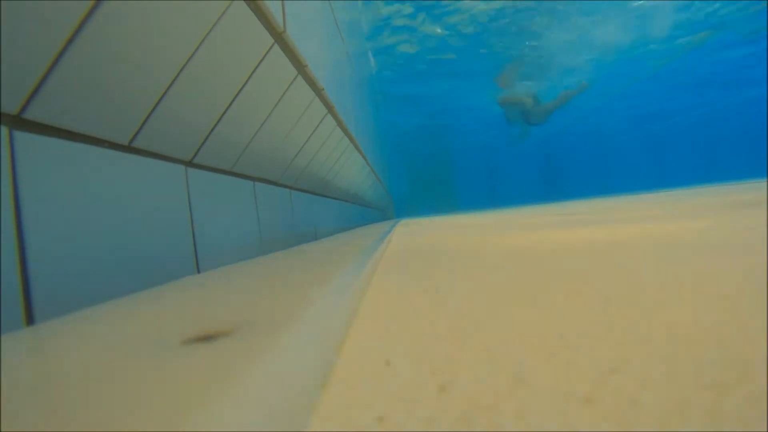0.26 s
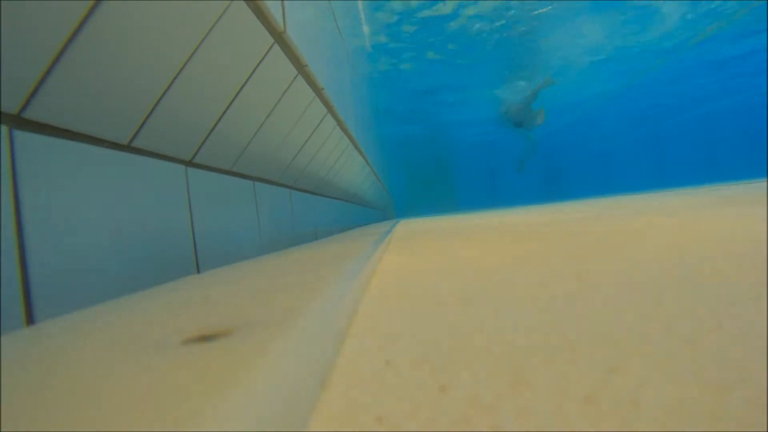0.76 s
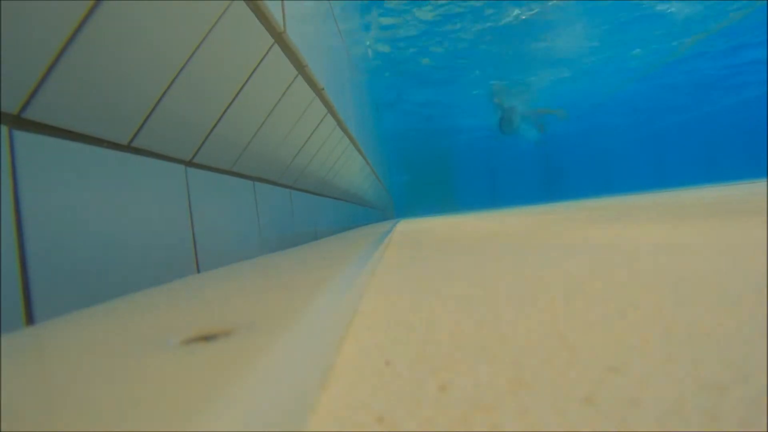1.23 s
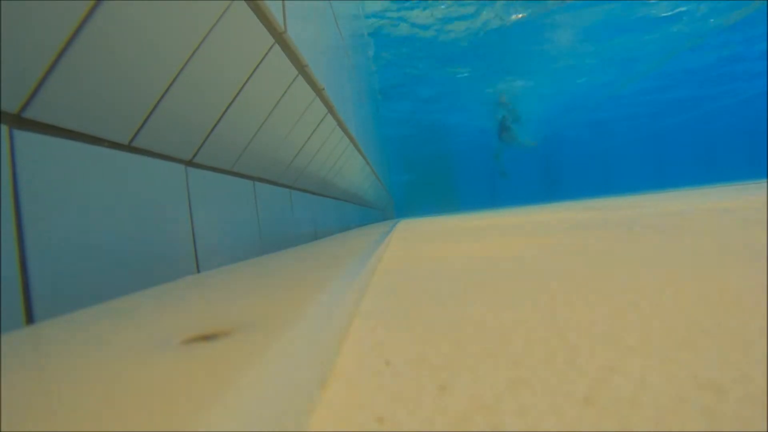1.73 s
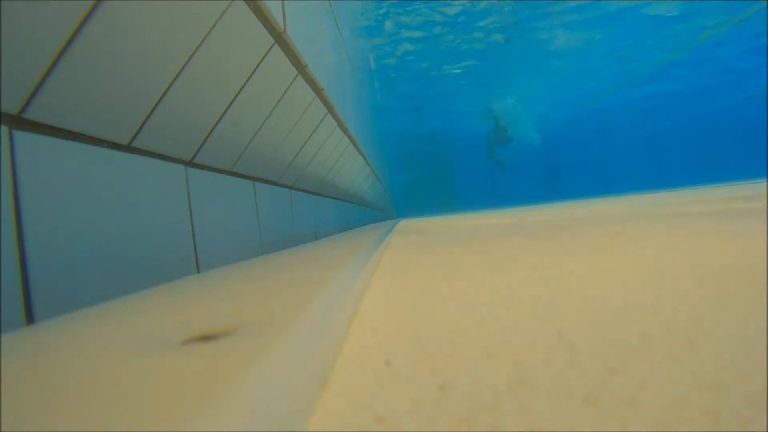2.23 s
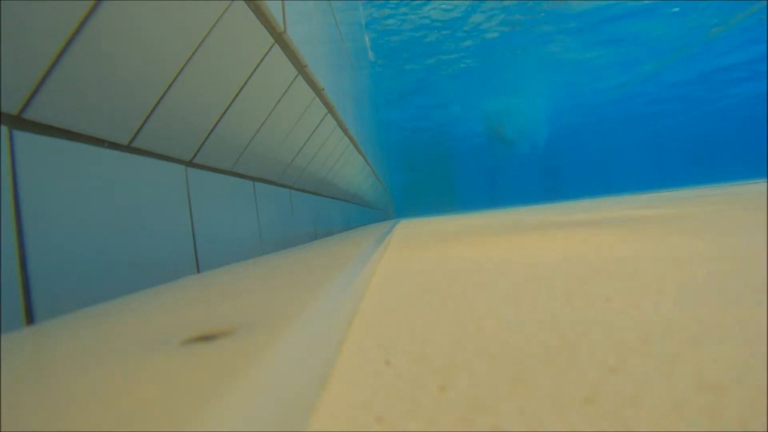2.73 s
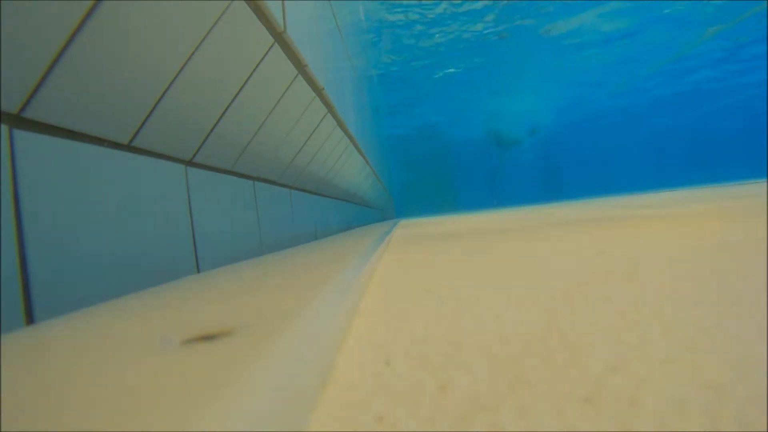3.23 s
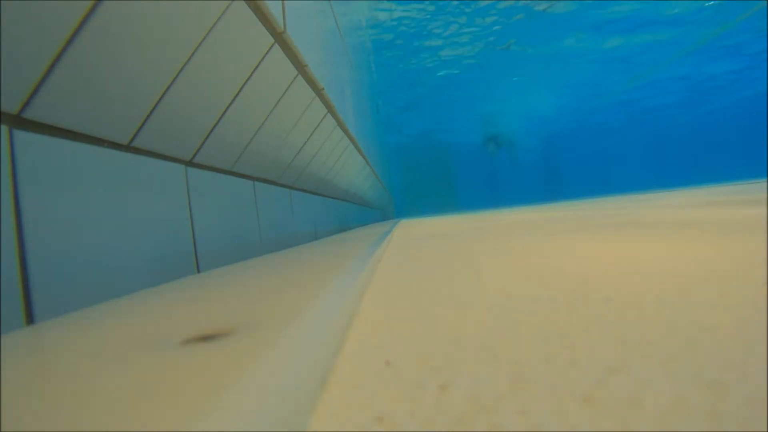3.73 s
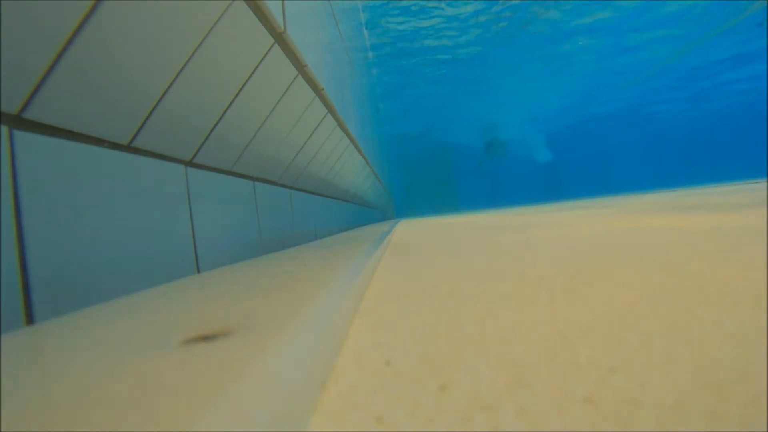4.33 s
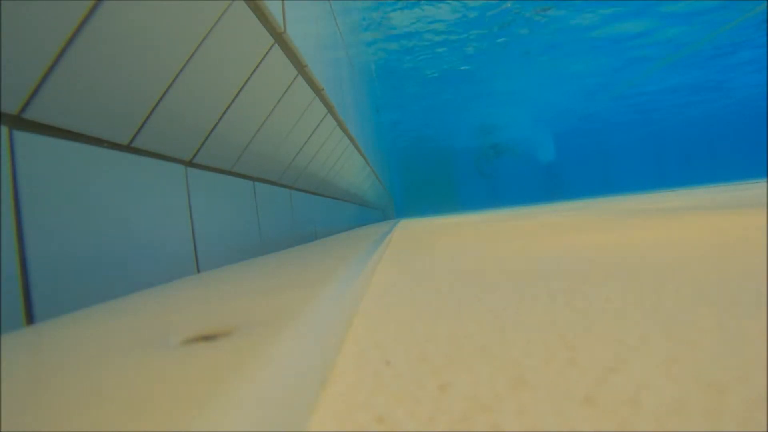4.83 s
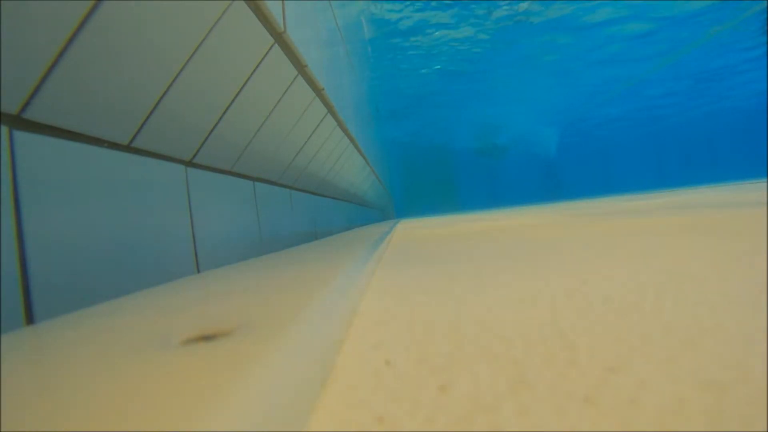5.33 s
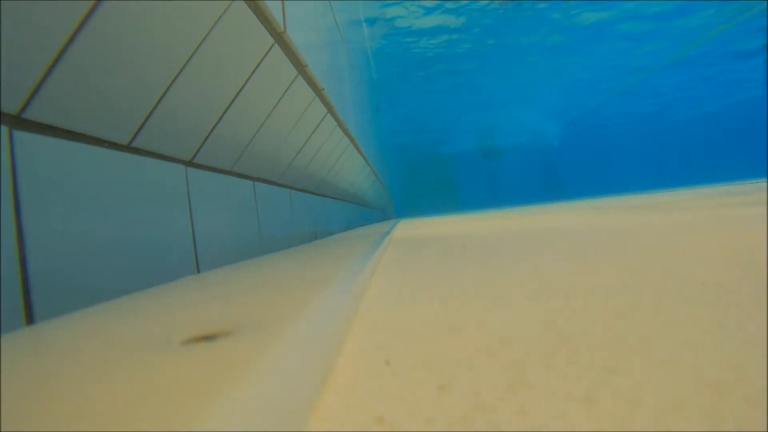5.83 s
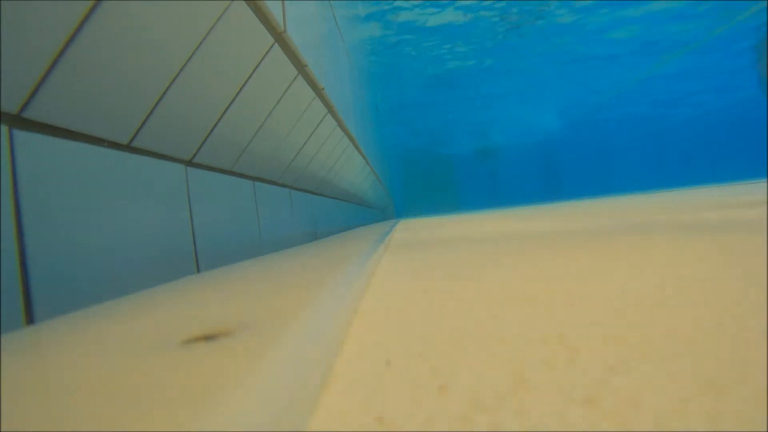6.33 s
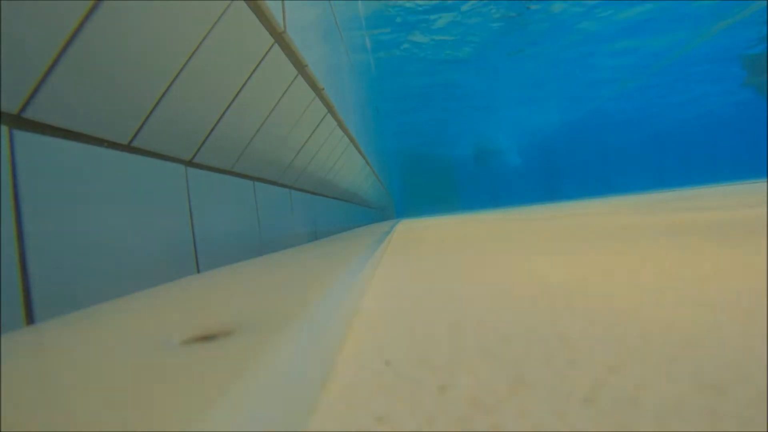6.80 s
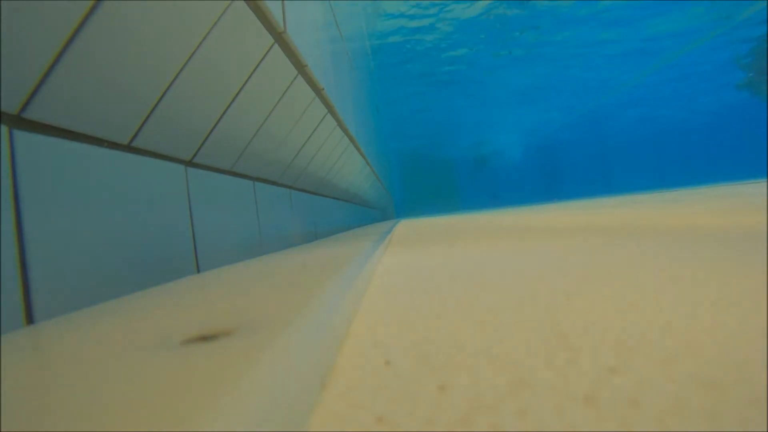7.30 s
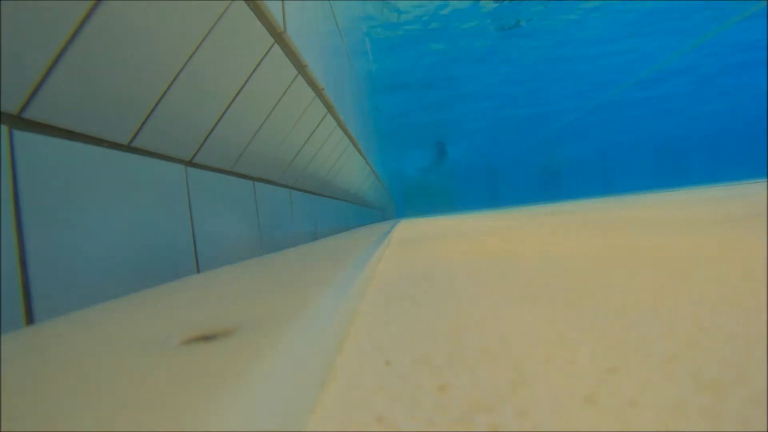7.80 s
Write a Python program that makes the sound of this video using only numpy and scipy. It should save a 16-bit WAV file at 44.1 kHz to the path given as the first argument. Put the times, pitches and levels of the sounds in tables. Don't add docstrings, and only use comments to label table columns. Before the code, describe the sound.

Muffled underwater pool ambience: low motor drone and weaker high tones, broad water rush and deep heaving bumps. Bubbles plop, gurgle and tick at irregular moments, brightest early on, over a thin flickering hiss from the stirred surface. Strokes become gradually fainter as swimmers recede. The close housing adds a small high ring, and low-quality digital warble pecks at the texture, with one tiny dropout close to the finish.

```python
import sys
import numpy as np
from scipy import signal
from scipy.fft import rfft, irfft, next_fast_len
from scipy.io import wavfile
from scipy.ndimage import uniform_filter1d, minimum_filter1d

SR = 44100
rng = np.random.default_rng(int(sys.argv[2]) if len(sys.argv) > 2 else 0)


def inscribe(sig):
    pcm = np.round(np.clip(np.atleast_2d(sig).T, -1, 1) * 32767)
    wavfile.write(sys.argv[1], SR, pcm.astype(np.int16))


def undo_db(level):
    steps = np.asarray(level, float) / 20
    return 10 ** steps


N = 355446


def colour(x, spectrum):
    hz, db = np.transpose(spectrum)
    size = next_fast_len(N + SR)
    log_hz = np.log(np.fft.rfftfreq(size, 1 / SR) + 1)
    log_gain = np.log(undo_db(np.interp(log_hz, np.log(hz), db, left=db[0], right=-90)))
    cepstrum = irfft(log_gain, size)
    cepstrum[1:size // 2] *= 2
    cepstrum[size // 2 + 1:] = 0
    y = irfft(rfft(x, size) * np.exp(rfft(cepstrum)), size)[:N]
    return y / y.std()


def noise(spectrum):
    return colour(rng.standard_normal(N), spectrum)


def walk(rate):
    hold = int(SR / rate)
    steps = np.repeat(rng.standard_normal(N // hold + 1), hold)
    return 1.45 * uniform_filter1d(uniform_filter1d(steps, hold), hold)[:N]


def grains(rate, spread_db):
    size_db = spread_db * np.minimum(rng.exponential(size=N), 3)
    return (rng.random(N) < rate / SR) * undo_db(size_db) * rng.choice([-1, 1], N)


def curve(table):
    s, level = np.transpose(table)
    return np.interp(np.arange(N) / SR, s, level)


def bumps(events, half_s=None):
    t = np.arange(N) / SR
    return sum(e[1] * np.exp(-((t - e[0]) / (half_s or e[2])) ** 2) for e in events)


def bubbles(events, cycles, glide, trim_db):
    out = np.zeros(N + SR)
    for s, db, hz in events:
        cycle = np.arange(0, 10 * cycles, hz / SR)[:SR]
        age = cycle / cycles
        ring = age * np.exp(1 - age) * np.sin(2 * np.pi * cycle * (1 + glide * age))
        start = int(s * SR)
        out[start:start + len(cycle)] += undo_db(db + trim_db) * ring
    return out[:N]


# frequency in Hz, level in dB rms.
PUMP_TONES = [(73.97, -55.9), (100.06, -55.4), (145.08, -55.5), (147.9, -38.1), (290.15, -59.6),
              (300.24, -59.3), (408.54, -64.3), (424.98, -65.1), (590.27, -58.5), (682.37, -56.8),
              (790.45, -53.2), (839.73, -61.8), (865.88, -50.6), (882.55, -54.8), (890.51, -48.1),
              (915.16, -50.6), (3451.84, -84.8), (9000.01, -87.5), (9816.37, -80.6), (9846.38, -79.0)]
# time in seconds, level in dB rms.
VANE_LEVEL = [(0, -38), (.86, -35.5), (1.5, -37.5), (1.9, -36), (3.17, -36.5), (3.39, -41), (3.62, -37),
              (4.1, -39), (4.45, -36.5), (4.6, -39), (5.01, -36), (5.27, -39.5), (5.5, -37), (5.76, -39),
              (6.06, -36), (6.26, -41), (6.42, -37.5), (8.06, -38.5)]
VANE_HZ = 147.9


def pumps():
    t = np.arange(N) / SR
    out = np.zeros(N)
    for hz, db in PUMP_TONES:
        level_db = curve(VANE_LEVEL) - 0.4 if hz == VANE_HZ else db + 0.99 * walk(2.38)
        out += 2 ** 0.5 * undo_db(level_db) * np.sin(2 * np.pi * (hz * t + rng.random()))
    return out


# frequency in Hz, level in dB per Hz.
HEAVE_SPECTRUM = [(10, -5), (20, 4), (35, -4), (48, -14), (65, -32)]
THUD_SPECTRUM = [(25, -27.5), (42, -7.5), (55, -7), (76, -1), (98, -1), (112, -13), (138, -1), (160, -12.5),
                 (190, -31)]
RUSH_SPECTRUM = [(140, -29.5), (165, -2.5), (215, -4.5), (255, -11), (310, -7.5), (450, -9.5), (590, -4),
                 (720, -6), (830, -4), (960, 0), (1030, -8), (1075, -4), (1250, -12), (1500, -14),
                 (1750, -33.5)]
# centre in seconds, strength in dB, half length in seconds.
WALL_WAVES = [(.82, 10, 0.28), (1.6, 9, .2), (2.2, -1, .5), (3.5, 2, .2), (4.05, 4, .12), (4.4, -8, .2),
              (5.01, 10, 0.15), (5.5, 9, .15), (6.06, 8, 0.24), (7.3, 10.5, 0.55), (8.0, -4, .1)]
# time in seconds, level in dB.
FLOW_LEVEL = [(0, -35.5), (.7, -37), (1.0, -35.5), (1.9, -37.5), (2.3, -35.5), (2.9, -35), (3.3, -37.5),
              (4.4, -35.5), (5.5, -37), (5.9, -39), (7.0, -37), (8.06, -39.5)]


def pipes():
    wave_db = bumps(WALL_WAVES)
    heave = undo_db(-51.5 + wave_db) * noise(HEAVE_SPECTRUM)
    thud = undo_db(-42.5 + 0.29 * wave_db) * noise(THUD_SPECTRUM)
    rush = undo_db(curve(FLOW_LEVEL) - 1.0 + 1.1 * walk(9)) * noise(RUSH_SPECTRUM)
    return heave + thud + rush


# frequency in Hz, level in dB per Hz.
SLOSH_SPECTRUM = [(1450, -17), (1700, -4.5), (2000, 0.5), (2200, -1.5), (2450, -10.5), (3100, -11),
                  (3900, -8.5), (4500, -12), (5000, -36)]
HOUSING_SPECTRUM = [(4200, -22.5), (4700, -12.5), (5300, -6), (5800, -0.5), (6200, -5.5), (6700, -1),
                    (7200, -12.5), (7700, -23)]
HISS_SPECTRUM = [(6900, -18), (7300, -1.5), (7900, -3), (9600, 0), (10800, -6.5), (11500, -9),
                 (12800, -7.5), (13900, -10.5), (14100, -53)]
# time in seconds, strength in dB.
SWIM_STROKES = [(0, 2.5), (.53, 4.5), (.95, 0.5), (1.25, 2.5), (1.85, 2.5), (2.1, 3.5), (2.5, 2.5),
                (2.75, 1.5), (2.97, 0.5), (3.3, 2), (3.55, 2.5), (3.85, 3), (4.2, 2), (4.65, 1.5),
                (4.98, 4), (5.25, 2.5), (5.5, 1), (5.7, 1.5), (5.85, 1), (6.55, 3.5), (6.9, 2.5),
                (7.55, 4.5), (7.8, 2)]
# calm level in dB, share of the stir as a ratio.
FIZZ_LEVELS = [
    (-59, .7),
    (-54, 1),
    (-59, .6),
]
STROKE_HALF_S, RECEDE_DB_PER_S = 0.13, 0.41


def surface():
    stir_db = bumps(SWIM_STROKES, half_s=STROKE_HALF_S) - RECEDE_DB_PER_S * np.arange(N) / SR
    slosh_db, ring_db, hiss_db = (db + share * stir_db for db, share in FIZZ_LEVELS)
    pops = grains(rate=400, spread_db=6.5)
    far_pops = np.roll(pops, N // 2)
    slosh = colour(rng.standard_normal(N) + 0.6 * pops, SLOSH_SPECTRUM)
    ring = colour(rng.standard_normal(N) + 1.5 * pops, HOUSING_SPECTRUM)
    hiss = colour(rng.standard_normal(N) + far_pops, HISS_SPECTRUM)
    slosh *= undo_db(slosh_db + 0.4 + 1.2 * walk(22))
    ring *= undo_db(ring_db + 1.05 + 1.2 * walk(26))
    hiss *= undo_db(hiss_db + 0.55 + 1.2 * walk(30))
    return slosh + ring + hiss


def babble(count=110, low_hz=350, octaves=2, db=-42, cycles=5.9, glide=0.015):
    events = []
    for when, size, pitch in rng.random((count, 3)):
        events.append((when * N / SR, db - 7.6 * size - 3.2 * pitch, low_hz * 2 ** (octaves * pitch)))
    return bubbles(events, cycles=cycles, glide=glide, trim_db=0.5)


# start in seconds, peak level in dB, frequency in Hz.
BLOOP_EVENTS = [(0.0274, -40, 1600), (0.9532, -41, 1720), (1.501, -45, 2100), (2.2069, -45, 1910),
                (2.6314, -48, 1880), (2.6908, -41, 1860), (2.8045, -40, 1600), (2.9886, -47, 2070),
                (4.2083, -43, 1990), (5.0185, -48, 1620), (5.7334, -51, 2060), (6.797, -37, 2070),
                (6.9207, -48, 1660), (7.0873, -44, 1580), (7.5018, -44, 1640), (7.5652, -41, 1800)]


def bloops():
    return bubbles(BLOOP_EVENTS, cycles=6.0, glide=0.01, trim_db=-4.0)


# start in seconds, peak level in dB, frequency in Hz.
CRACKLE_EVENTS = [(0.0563, -42, 9910), (0.2563, -48, 9830), (0.8654, -43, 9500), (1.1932, -42, 8670),
                  (1.2156, -42, 9900), (1.2294, -42, 8340), (1.296, -39, 9700), (1.8058, -43, 9860),
                  (1.9884, -37, 9370), (2.0224, -43, 8450), (2.0614, -43, 9510), (3.1956, -39, 8550),
                  (3.8033, -43, 9720), (4.3565, -40, 8310), (4.9262, -46, 9500), (5.0868, -42, 8620),
                  (5.5029, -44, 7600), (5.7064, -46, 7620), (6.321, -44, 9010), (6.9296, -41, 9840),
                  (7.4769, -44, 9570), (7.7218, -42, 8570)]


def crackles():
    return bubbles(CRACKLE_EVENTS, cycles=3.1, glide=0.0073, trim_db=1.0)


# start in seconds, peak level in dB, frequency in Hz.
TICK_EVENTS = [(0.1366, -34.5, 6620), (0.2567, -34, 5790), (0.6065, -26.5, 5900), (0.8664, -41, 5920),
               (1.0964, -39, 5580), (1.2047, -35, 5900), (1.2291, -31.5, 6600), (1.2974, -41, 5400),
               (1.4132, -36, 6090), (1.5898, -29, 5430), (1.6392, -39, 6530), (1.923, -35, 5700),
               (1.9884, -36, 5710), (2.0614, -38, 5710), (2.5324, -33, 5880), (3.196, -38, 6690),
               (4.357, -41, 6050), (4.568, -35, 5670), (4.8065, -35, 5930), (4.9264, -37, 6580),
               (5.5483, -37, 6670), (6.9296, -42, 6750), (7.0189, -34, 5840), (7.136, -33, 6630),
               (7.4774, -36, 5690)]


def ticks():
    return bubbles(TICK_EVENTS, cycles=3.8, glide=0.012, trim_db=-3.0)


# start in seconds, peak level in dB, frequency in Hz.
GURGLE_EVENTS = [(.325, -29.5, 695), (.455, -40, 1320), (.585, -43, 1180), (.895, -43.5, 459),
                 (1.005, -37, 480), (1.025, -35, 1140), (1.985, -46, 1326), (2.105, -41, 1220),
                 (2.235, -37, 426), (2.735, -32, 613), (3.255, -38, 373), (3.615, -35, 543),
                 (4.485, -37, 647), (5.445, -34, 490), (5.635, -40, 1450), (6.355, -35, 496),
                 (6.755, -33.5, 1260), (6.83, -39, 617), (7.045, -29, 633), (7.515, -39, 1290)]


def gurgles():
    return bubbles(GURGLE_EVENTS, cycles=6.0, glide=0.015, trim_db=-1.5)


# start in seconds, peak level in dB, frequency in Hz.
BOOM_EVENTS = [
    (1.53, -32, 47.5),
    (3.22, -40, 390),
    (5.57, -36.5, 218),
    (7.4, -39.5, 306),
    (7.7, -37.5, 210),
]


def booms():
    return bubbles(BOOM_EVENTS, cycles=3.8, glide=0.0092, trim_db=-1.5)


def scene():
    far_fizz = babble(count=90, low_hz=1700, octaves=0.35, db=-52, cycles=12.5, glide=0)
    water = pumps() + pipes() + surface() + babble() + far_fizz
    rings = bloops() + crackles() + ticks() + gurgles() + booms()
    return (water + rings)[None]


FRAME_S = 1024 / 48000


def cosine_basis():
    hop = round(FRAME_S * SR)
    n = np.arange(2 * hop) + 0.5
    k = np.arange(hop)[:, None] + 0.5
    window = np.sin(np.pi * n / (2 * hop))
    basis = np.sqrt(2 / hop) * window * np.cos(np.pi / hop * (n + hop / 2) * k)
    return hop, basis, k[:, 0] * SR / (2 * hop)


# frequency in Hz, level in dB.
MASKING_LEVEL = [(1500, -14), (2300, -5), (2900, -3.5), (3500, -4), (4400, -6), (5000, -10), (9500, -9),
                 (11300, -4.5), (12600, -4), (13900, -2)]


def mask(x, size=5):
    hop, basis, hz = cosine_basis()
    lines = np.lib.stride_tricks.sliding_window_view(x, 2 * hop)[::hop] @ basis.T
    bands = np.arange(0, hop, size)
    power = uniform_filter1d(np.add.reduceat(lines ** 2, bands, axis=1), size=2, axis=0)
    mask_hz, mask_db = np.transpose(MASKING_LEVEL)
    under_db = np.interp(np.log(hz[bands]), np.log(mask_hz), mask_db, left=-90)
    usual = uniform_filter1d(power, size=15, axis=0)
    kept = minimum_filter1d(power > usual * undo_db(under_db) ** 2, size=2, axis=0, origin=-1)
    lost = (lines * ~kept[:, np.arange(hop) // size]) @ basis
    out = x.copy()
    out[:len(lost) * hop] -= lost[:, :hop].ravel()
    out[hop:(len(lost) + 1) * hop] -= lost[:, hop:].ravel()
    return out


# centre in seconds, length in frames, rounding step in dB.
STARVED_FRAMES = [(.188, 1, -34.5), (0.215, 1, -30.5), (.347, 1, -29.5), (0.602, 1, -31), (.794, 1, -34),
                  (.921, 1, -33), (1.476, 1, -35), (1.589, 1, -28.5), (1.746, 1, -37), (1.924, 1, -35.5),
                  (2.364, 1, -31.5), (2.449, 1, -33), (2.563, 1, -34.5), (2.758, 2, -33), (2.855, 1, -35.5),
                  (3.005, 1, -35.5), (3.045, 2, -35.5), (3.546, 1, -35), (3.59, 1, -32), (3.643, 1, -31),
                  (3.907, 1, -32), (4.283, 1, -31), (4.626, 1, -36.5), (5.209, 1, -29.5), (5.252, 1, -34),
                  (6.297, 1, -33.5), (6.362, 1, -33.5), (6.766, 1, -34), (7.385, 1, -32), (7.706, 1, -34.5)]
PINCHED_CENTRES = [.317, .361, 1.049, 1.584, 1.68, 3.9, 4.496]
PINCHED_DB = -37


def starve(x):
    hop, basis, hz = cosine_basis()
    fine = np.minimum((hz / 1400) ** 5, 1) * np.where(hz > 12800, undo_db(-14.5), 1)
    out = x.copy()
    for s, frames, step_db in list(STARVED_FRAMES) + [(s, 1, PINCHED_DB) for s in PINCHED_CENTRES]:
        count = round(frames)
        step = undo_db(step_db) * fine
        for j in range(count):
            start = int(s * SR + (j - (count + 1) / 2) * hop)
            lines = basis @ out[start:start + 2 * hop]
            rounded = step * np.sign(lines) * np.floor(abs(lines) / step + 0.4)
            out[start:start + 2 * hop] += (rounded - lines) @ basis
    return out


LOST_PACKET = 7.78967, 7.82295


def lose_packet(x, dry):
    start, end = (int(s * SR) for s in LOST_PACKET)
    before, after = np.arange(-100, 0) / SR, np.arange(100) / SR
    ring = np.exp(-((before + 0.0008) / 0.00063) ** 2) * np.sin(2 * np.pi * 6900 * before)
    x[start - 100:start] += undo_db(-32.5) * ring
    x[start:end] = undo_db(-40) * uniform_filter1d(dry[0, start:end], size=7)
    x[end:end + 100] += (undo_db(-27) - x[end]) * np.exp(-after / 0.0005)
    return x


def top_cut(x):
    return signal.sosfilt(signal.butter(12, 14660, fs=SR, output="sos"), x)


def record(dry):
    offset = 0.0106
    x = starve(mask(dry[0])) + offset
    mix = lose_packet(x, dry)[None]
    return top_cut(mix)


dry = scene()
out = record(dry)
inscribe(out)
```